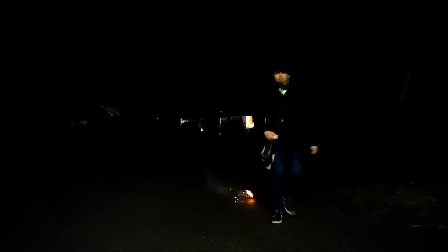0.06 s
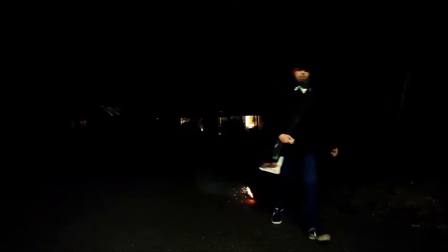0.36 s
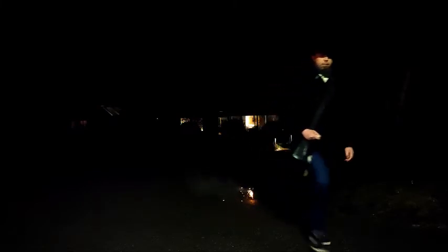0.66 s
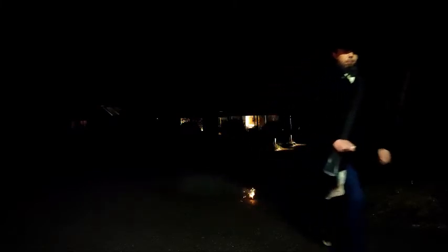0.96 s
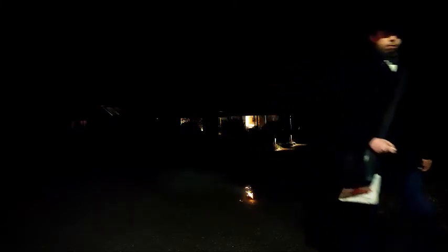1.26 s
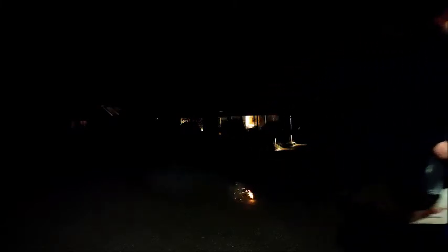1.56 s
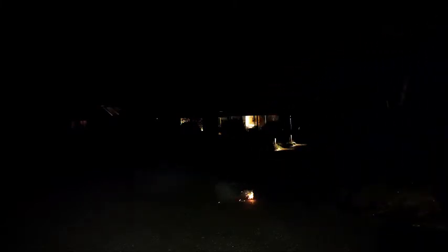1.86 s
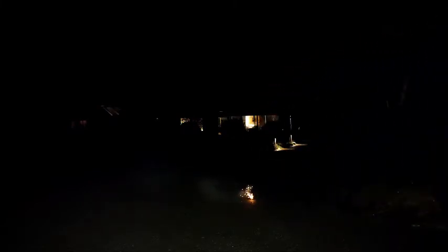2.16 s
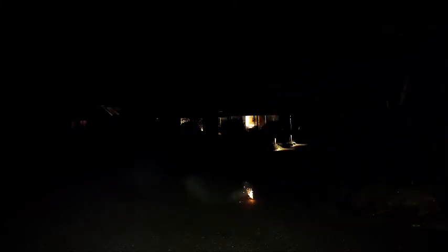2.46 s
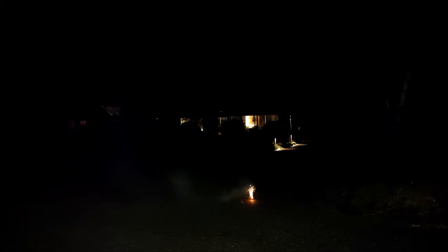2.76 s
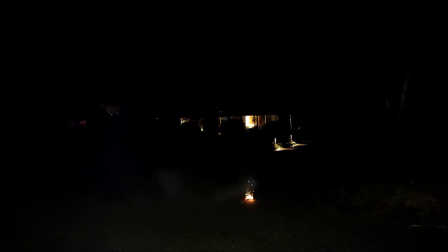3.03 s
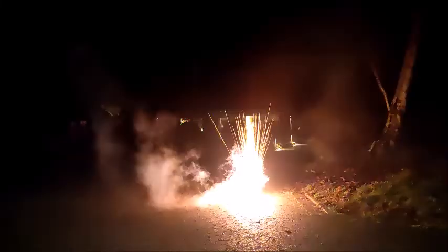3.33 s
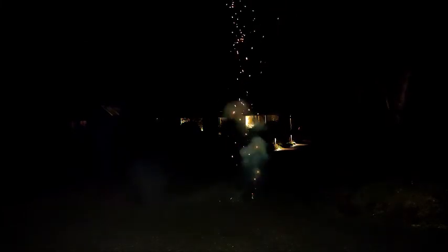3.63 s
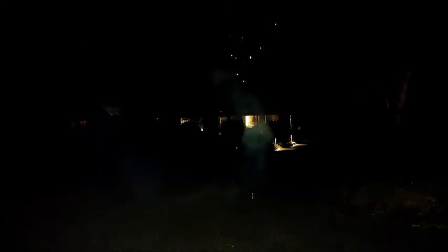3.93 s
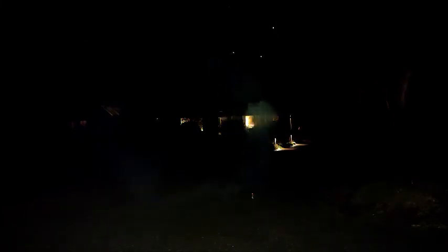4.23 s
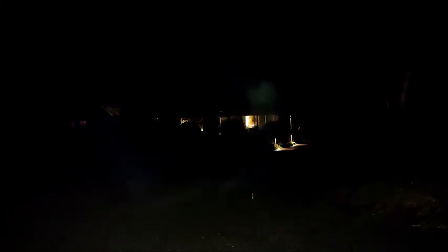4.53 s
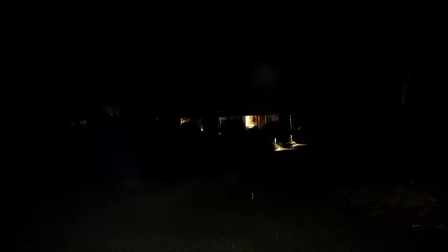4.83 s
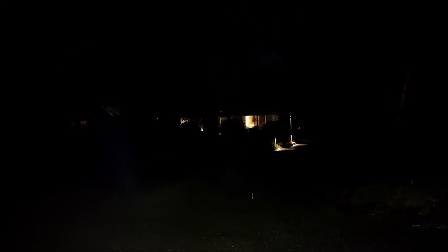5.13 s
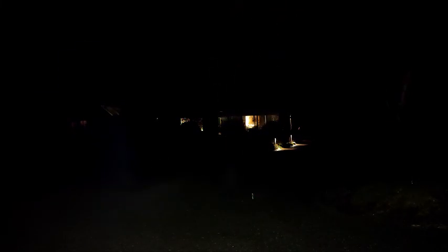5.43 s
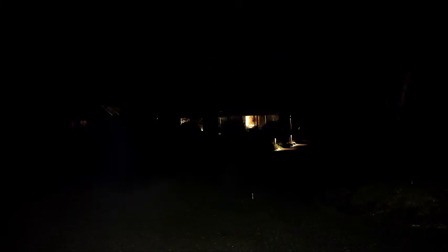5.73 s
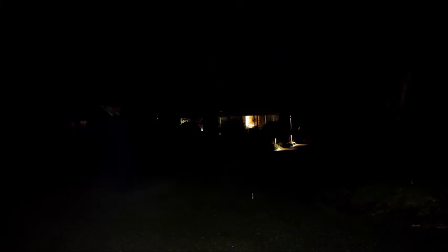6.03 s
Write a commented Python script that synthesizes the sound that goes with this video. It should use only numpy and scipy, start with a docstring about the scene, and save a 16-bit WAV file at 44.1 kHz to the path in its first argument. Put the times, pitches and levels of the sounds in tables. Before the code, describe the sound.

A fuse fizzes faintly under soft footsteps, then a firework launches with a bang and hiss and bursts with a loud, echoing boom.

```python
"""A firework on a street at night. Over the hum of a distant town a fuse fizzes while someone walks away.
At 3.4 s the lift charge thumps and throws a hissing jet of sparks, one of which cracks; at 4.9 s the
shell bursts overhead. Each bang is a group of shock waves that overloads the microphones, whose bias
lurches and settles, while the echoes roll back from houses and trees, dulled by absorption in the air."""
import sys
import numpy as np
from scipy import signal
from scipy.fft import rfft, irfft, next_fast_len
from scipy.io import wavfile
from scipy.ndimage import map_coordinates

SR = 44100
rng = np.random.default_rng(int(sys.argv[2]) if len(sys.argv) > 2 else 0)


def materialize(psi):
    """Save the field psi as 16-bit PCM at rate SR to the path in sys.argv[1].

    A 1-D psi becomes a single channel; in a 2-D psi each row is a channel.
    """
    bounded = np.clip(np.atleast_2d(psi).T, -1, 1)
    quanta = np.round(bounded * 32767).astype(np.int16)
    wavfile.write(sys.argv[1], SR, quanta)


N = 272670

# shocks of the lift, the cracking spark and the burst:
# start_s, push_db, push_ms, suction_db, suction_ms, scatter_db
SHOCK_WAVES = [(3.4329, -12, 0.19, -17, 0.23, -22.5), (3.4347, -1, 0.33, -12, 1.1, -15.5),
               (3.6100, -1, 0.16, -7.5, 0.21, -48), (4.8927, -10, 0.37, -1, 1.09, -20.5),
               (4.8949, -11, 0.18, -10, 0.63, -36), (4.8992, -12, 0.45, -1, 1.35, -19.5)]
# spectrum of the finest sparks: frequency_hz, density_db
SPARK_SPECTRUM = [(300, -53), (4000, -24.5), (8000, -9.5), (12000, 1), (14500, -1.5)]


def amp(db):
    return 10 ** (np.asarray(db) / 20)


def unit(x):
    return x / np.sqrt(np.mean(x ** 2) + 1e-20)


def along(points, hz):
    """Interpolation of (frequency_hz, value) points on a logarithmic frequency axis."""
    frequencies, values = np.transpose(points)
    return np.interp(np.log(hz + 1), np.log(frequencies + 1), values)


def since(start_s):
    """Seconds since a moment, zero before it."""
    return np.maximum(np.arange(N) / SR - start_s, 0)


def wobble(rate_hz):
    """Smooth random modulation: a spline through Gaussian values."""
    knots = rng.standard_normal(int(N * rate_hz / SR) + 4)
    return map_coordinates(knots, [np.arange(N) * rate_hz / SR])


def filtered(x, response):
    """Linear filtering: the spectrum is multiplied by a frequency response."""
    n = x.shape[-1]
    padded = next_fast_len(n + 8192)
    return irfft(rfft(x, padded) * response(np.fft.rfftfreq(padded, 1 / SR)), padded)[..., :n]


def add(track, start_s, sound):
    """Superposition of a sound on a track."""
    part = track[..., round(start_s * SR):][..., :sound.shape[-1]]
    part += sound[..., :part.shape[-1]]


def diffuse(pair, colour):
    """A diffuse field of rms 1: left and right are coherent mainly at long wavelengths."""
    coherence = [(60, 0.67), (140, .88), (300, 0.78), (650, 0.17), (1400, -0.065), (3000, 0.25),
                 (14000, -0.14)]  # frequency_hz, left_right_correlation
    balance = [(1300, 0), (2400, 0), (4400, -2.5), (8000, -2), (14000, 0)]  # frequency_hz, left_minus_right_db
    angle = lambda hz: np.arccos(np.clip(along(coherence, hz), -1, 1)) / 2
    mid, side = filtered(pair, lambda hz: colour(hz) * np.array([np.cos(angle(hz)), np.sin(angle(hz))]))
    stereo = np.array([mid + side, mid - side])
    return unit(filtered(stereo, lambda hz: amp(along(balance, hz) * np.array([[.5], [-.5]]))))


def grains(spectrum, spread_db):
    """Log-normal modulation breaks noise into dense tiny clicks, rms 1."""
    clicks = rng.standard_normal((2, N)) * amp(spread_db * wobble(1500))
    return diffuse(clicks, lambda hz: amp(along(spectrum, hz)))


def puff(length_s, colour):
    """A noise transient with a linear onset and an exponential decay."""
    age = np.arange(SR // 5) / SR / length_s * np.e
    return diffuse(rng.standard_normal((2, len(age))), colour) * age * np.exp(1 - age)


def hump(centre_hz, q):
    """The response of a damped resonance in series with a broader one."""
    detune = lambda hz: hz / centre_hz - centre_hz / (hz + 1)
    return lambda hz: 1 / (1 + 1j * q * detune(hz)) / (1 + .25j * detune(hz))


def town(level_db=-57.5, swell_db=1.5):
    """Distant sources sum incoherently to a low noise whose level wanders."""
    spectrum = [(12, 2), (30, -0.5), (80, -5.5), (140, -12.5), (280, -20), (600, -22.5), (2000, -24),
                (4500, -33), (7500, -32), (9500, -39.5), (14000, -37.5)]  # frequency_hz, density_db
    return amp(level_db + swell_db * wobble(3.51)) * grains(spectrum, spread_db=0)


def walker(sole_lag_s=.052):
    """Impact and friction: a heel thuds and crushes grit, the sole follows, and at times a shoe scrapes."""
    steps = [(0.426, -45, 213, -68), (0.899, -55, 120, -64.5), (1.461, -41, 232, -63),
             (1.955, -46.5, 167, -61), (2.084, -53.5, 230, -63), (2.488, -40.5, 188, -61),
             (3.002, -47.5, 180, -64), (3.114, -50.5, 210, -63), (3.162, -46, 250, -69)]  # footfalls on asphalt: start_s, heel_db, pitch_hz, sole_db
    scuffs = [(0.066, -64.5, 800, 0.094, 0.89), (0.664, -58, 660, 0.031, 1.8),
              (0.943, -60, 1500, 0.049, 0.43), (1.047, -59, 910, 0.018, 3.2),
              (2.116, -61, 700, 0.031, 0.78), (3.156, -56, 890, 0.017, 0.32), (4.631, -54, 875, 0.014, 2.4),
              (4.667, -60, 1380, 0.1, 0.4), (4.74, -46, 748, 0.011, 1.6), (4.793, -50.5, 680, .035, 0.68)]  # scrapes on grit: start_s, level_db, pitch_hz, length_s, resonance_q
    out, t = np.zeros((2, N)), np.arange(SR // 10) / SR
    for start_s, heel_db, pitch_hz, sole_db in steps:
        cycles = t * pitch_hz - .75
        thud = amp(heel_db + 1.5) * np.sin(2 * np.pi * cycles) * np.exp(-(cycles / 0.49) ** 2)
        grit = amp(heel_db - 21.5) * puff(0.026, lambda hz: hump(724, q=1)(hz) ** 2)
        sole = amp(sole_db) * puff(0.043, lambda hz: hump(430, q=0.94)(hz) ** 2)
        add(out, start_s, thud)
        add(out, start_s, grit)
        add(out, start_s + sole_lag_s, sole)
    for start_s, level_db, pitch_hz, length_s, q in scuffs:
        add(out, start_s, amp(level_db) * puff(length_s, lambda hz: hump(pitch_hz, q)(hz) ** 2))
    return out


def fuse(smoulder_db=-67, brightening=0.54, sputter_db=1.3, sparks_db=-72):
    """Unsteady combustion: the fuse fizzes, brighter as it flares, until it reaches the charge."""
    flares = [(0.0, -70.5), (0.25, -64.5), (0.29, -71), (0.51, -67), (0.6, -77), (1.0, -67.5), (1.53, -64),
              (1.77, -70), (2.08, -61.5), (2.24, -63), (2.26, -67.5), (2.5, -62.5), (2.57, -56.5),
              (2.6, -65), (2.74, -67), (2.77, -61.5), (3.25, -59), (3.4, -62.5)]  # strength of the flame: time_s, level_db
    spectrum = [(200, -16.5), (500, -5), (1000, -10.5), (2100, -2), (4100, -3), (7700, -1), (9200, -15.5),
                (14000, -25)]  # frequency_hz, density_db
    burn_db = np.interp(since(0), *np.transpose(flares)) + 2
    hiss_db = 20 * np.log10(np.hypot(amp(smoulder_db), amp(burn_db)))
    flare_db = hiss_db - np.mean(hiss_db)
    fizz = grains(spectrum, spread_db=1.5)
    treble = filtered(fizz, lambda hz: hz ** 4 / (hz ** 4 + 4500 ** 4))
    flame = unit(fizz + treble * (amp(brightening * flare_db) - 1))
    flame *= amp(hiss_db + sputter_db * wobble(25))
    sparks = grains(SPARK_SPECTRUM, spread_db=4) * amp(sparks_db + .4 * flare_db + 1.1 * wobble(16))
    lift_s = SHOCK_WAVES[1][0]
    return (flame + sparks) * (since(lift_s) == 0)


def spits():
    """Brief events have broad spectra: sparks spit and grit ticks in bright puffs."""
    ticks = [(2.536, -49.5, 0.02), (2.564, -48.5, 0.015), (4.078, -56, 0.014), (4.678, -55, 0.005),
             (4.793, -58, .014), (4.807, -57, 0.022)]  # start_s, level_db, length_s
    spectrum = [(1000, -7), (3000, -3), (7000, 3.5), (9500, -3), (14000, -3.5)]  # frequency_hz, density_db
    out = np.zeros((2, N))
    for start_s, level_db, length_s in ticks:
        add(out, start_s, amp(level_db) * puff(length_s, lambda hz: amp(along(spectrum, hz))))
    return out


def embers(start_s=3.432, launch_db=-30, launch_t60_s=.12, sizzle_db=-63, sizzle_t60_s=3.3):
    """A two-slope decay: fine sparks crackle out of the tube, then sizzle as they burn out in the air."""
    t = since(start_s)
    envelope = amp(launch_db - 60 * t / launch_t60_s) + amp(sizzle_db - 60 * t / sizzle_t60_s)
    return grains(SPARK_SPECTRUM, spread_db=3.5) * envelope * amp(1.5 * wobble(14)) * (t > 0)


def far_rumble(start_s=3.95, level_db=-58, t60_s=5):
    """Distance acts as a low-pass filter: only the lift's low notes return from far away, and linger."""
    t = since(start_s)
    envelope = amp(level_db - 60 * t / t60_s) * (1 - np.exp(-t / 0.024))
    return diffuse(rng.standard_normal((2, N)), hump(250, q=0.89)) * envelope


def wall_slaps(q=1.42):
    """Discrete reflections: house fronts on either side return the bangs as separate smeared knocks."""
    reflections = [(3.469, -23.5, 690, .007, 4), (3.499, -28.5, 1400, .006, 7),
                   (3.535, -24.5, 1000, 0.0094, 3.5), (3.571, -25, 790, .006, 0),
                   (3.711, -33.5, 480, .03, 3), (3.967, -38.5, 1140, .005, 0), (4.125, -50, 430, .025, -2),
                   (4.914, -26, 1500, .005, 0), (5.013, -20.5, 450, .007, 2), (5.036, -19.5, 1180, .006, 1),
                   (5.057, -20.5, 615, .006, 2), (5.14, -31, 170, .035, -1), (5.26, -26, 636, .007, 1),
                   (5.61, -39.5, 1000, .015, -3)]  # start_s, level_db, pitch_hz, length_s, left_minus_right_db
    out = np.zeros((2, N))
    for start_s, level_db, pitch_hz, length_s, side_db in reflections:
        knock = puff(length_s, lambda hz: hump(pitch_hz, q)(hz) / (1 + (hz / 6000) ** 2))
        add(out, start_s, amp(level_db + side_db * np.array([[.5], [-.5]])) * knock)
    return out


def reverberation(start_s, waves, spectrum, spread_db, flutter_db, twin_gain=0, twin_gap_s=.0068):
    """Waves of countless echoes add in power; air absorption dulls the later ones."""
    absorption = [(500, -2), (2000, -0.5), (4000, 3.5), (7000, 13), (10000, 41), (14000, 39.5)]  # frequency_hz, loss_db_per_s
    # a double shock repeats in every echo and combs the low notes
    comb = lambda hz: 1 + twin_gain * np.exp(-2j * np.pi * hz * twin_gap_s - hz / 2500)
    echoes = unit(filtered(grains(spectrum, spread_db), comb))
    hz, t, frames = signal.stft(echoes, SR, nperseg=256)
    travel_s = np.maximum(t - start_s, 0) - 0.24  # zero where an echo has the bang's own spectrum
    loss_db = along(absorption, hz)[:, None] * travel_s
    echoes = signal.istft(frames * amp(-loss_db), SR, nperseg=256)[1][:, :N]
    power = np.zeros(N)
    for delay_s, level_db, rise_s, t60_s in waves:
        age = since(start_s + delay_s)
        power += (amp(level_db - 60 * age / t60_s) * (1 - np.exp(-age / rise_s))) ** 2
    return echoes * np.sqrt(power) * amp(flutter_db * wobble(65))


def bias_lurch(settle_hz=2.32):
    """Overload shifts the microphones' bias; the coupling capacitor, a high-pass, drains the offset."""
    kicks = [(3.435, -0.031, -0.68), (4.8934, -0.24, -0.12), (4.9008, -0.16, -0.45)]  # shocks drive the bias down: start_s, left_shift, right_shift
    heaves = [(3.532, 0.036, 0.19, .007), (3.554, 0, 0.40, .009), (3.709, 0.0073, 0.05, .005),
              (4.988, 0.11, 0.14, .009), (5.01, 0.21, 0.21, .004), (5.03, 0.12, 0.27, .06)]  # strong echoes lift it: start_s, left_shift, right_shift, rise_s

    def jolt(start_s, left, right, rise_s, recovery_s):
        """A ramp away from rest with exponential relaxation."""
        t = since(start_s)
        return np.outer([left, right], np.minimum(t / rise_s, 1) * np.exp(-t / recovery_s))

    bias = sum(jolt(*kick, rise_s=.0009, recovery_s=0.049) for kick in kicks)
    bias += sum(jolt(*heave, recovery_s=2.6) for heave in heaves)
    return signal.lfilter(*signal.butter(1, settle_hz, "high", fs=SR), bias)


def spray(start_s, level_db, rise_s, t60_s):
    """Jet noise: burning powder rushes out with a bright hiss."""
    spectrum = [(500, -16.5), (1500, -7.5), (4000, -12.5), (7500, 0.5), (9500, -13.5), (14000, -6.5)]  # frequency_hz, density_db
    t = since(start_s)
    envelope = amp(level_db - 60 * t / t60_s) * (1 - np.exp(-(t / rise_s) ** 2))
    return grains(spectrum, spread_db=-3.5) * envelope


def lift_charge():
    """Expanding gas drives a flash and a jet of sparks from the tube, and the street reverberates."""
    waves = [(0, -26.5, .003, 0.69), (.098, -29.5, 0.0096, 1.306)]  # echoes from ground and houses: delay_s, level_db, rise_s, t60_s
    spectrum = [(45, -10.5), (90, -3.5), (300, -7), (600, -7.5), (1400, -7), (2000, -8), (3400, -12.5),
                (5200, -17), (7300, -17), (9500, -29), (14500, -36.5)]  # frequency_hz, density_db
    flash = spray(3.430, level_db=-18.5, rise_s=0.0014, t60_s=0.038)
    jet = spray(3.433, level_db=-29.5, rise_s=.004, t60_s=0.32)
    return flash + jet + reverberation(3.435, waves, spectrum, spread_db=2, flutter_db=.5)


def shell_burst():
    """The shell flashes overhead; ground, houses and distant trees reflect its bang in order of range."""
    waves = [(0, -23.3, 0.0024, .8), (.106, -18.3, .034, 1.258), (.64, -43.7, 0.034, 3.6)]  # delay_s, level_db, rise_s, t60_s
    spectrum = [(45, -6.5), (90, -5), (200, -4.5), (350, -3), (600, -0.5), (850, -4.5), (1450, -11.5),
                (2000, -8.5), (2800, -13.5), (4600, -19.5), (7500, -20), (9600, -31.5), (14500, -40)]  # frequency_hz, density_db
    flash = spray(4.892, level_db=-22.5, rise_s=0.00029, t60_s=0.12)
    return flash + reverberation(4.895, waves, spectrum, spread_db=1.5, flutter_db=0.85, twin_gain=0.16)


def shocks(scatter_t60_s=0.028):
    """A blast wave is a short compression and a longer rarefaction, scattered by the ground nearby."""
    out, t = np.zeros((2, N)), np.arange(SR // 5) / SR
    lobe = lambda start_ms, width_ms: np.sin(np.pi * np.clip((1000 * t - start_ms) / width_ms, 0, 1))
    for start_s, push_db, push_ms, suction_db, suction_ms, scatter_db in SHOCK_WAVES:
        wave = amp(push_db) * lobe(0, push_ms) ** 2 - amp(suction_db) * lobe(push_ms, suction_ms)
        scatter = diffuse(rng.standard_normal((2, len(t))), hump(550, q=0.37))
        add(out, start_s, wave + amp(scatter_db - 60 * t / scatter_t60_s) * scatter)
    return out


def scene():
    """Superposition of the town, the firework with its echoes, the footsteps and the shifting bias."""
    background = town()
    firework = lift_charge() + shell_burst() + fuse()
    footsteps = walker()
    firework += spits() + shocks() + embers()
    return background + footsteps + firework + wall_slaps() + far_rumble() + bias_lurch()


def record(dry, ceiling=1.0, band_limit_hz=14550):
    """Saturation in the input stage rounds off the peaks; a steep low-pass limits the band."""
    clipped = dry / (1 + np.abs(dry / ceiling) ** 8) ** (1 / 8)
    return filtered(clipped, lambda hz: 1 / (1 + (hz / band_limit_hz) ** 120))


dry = scene()
out = record(dry)
materialize(out)
```